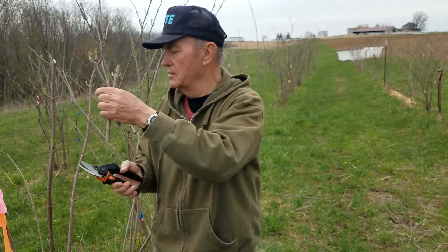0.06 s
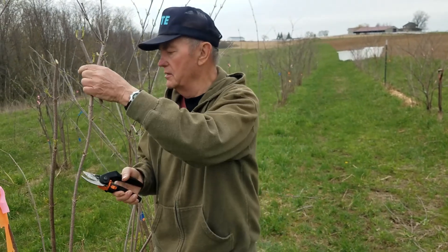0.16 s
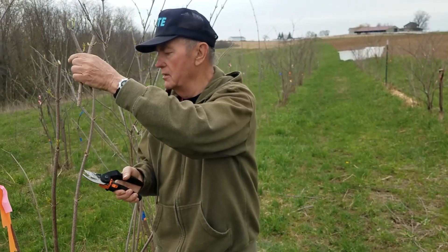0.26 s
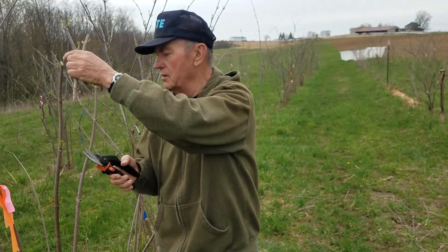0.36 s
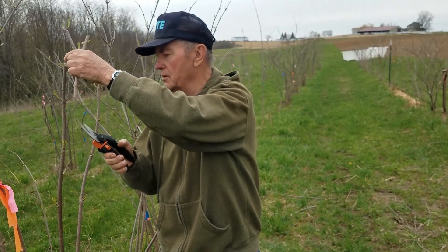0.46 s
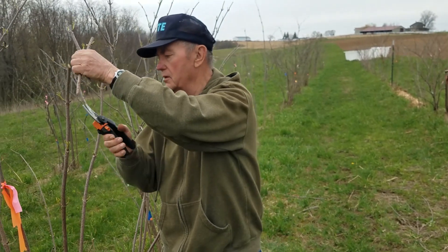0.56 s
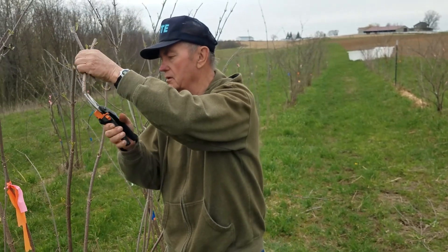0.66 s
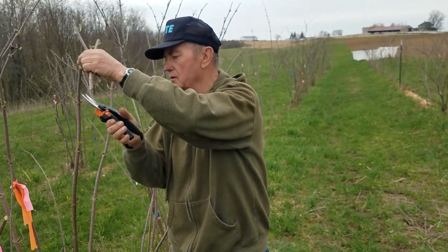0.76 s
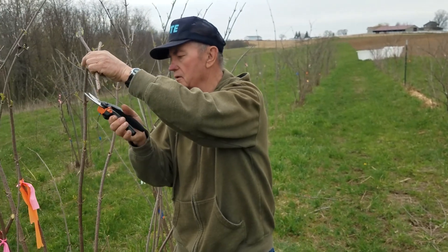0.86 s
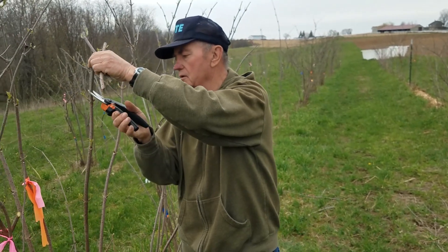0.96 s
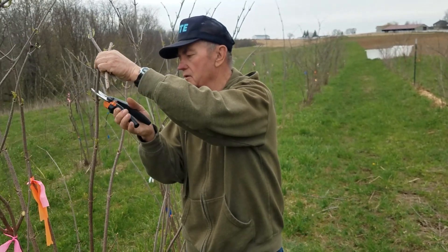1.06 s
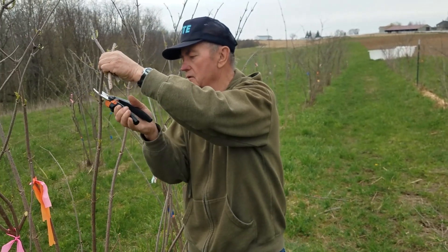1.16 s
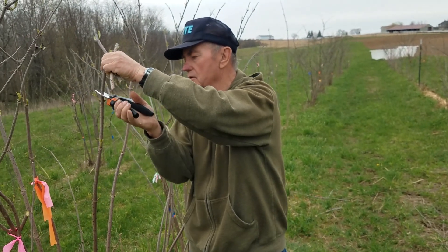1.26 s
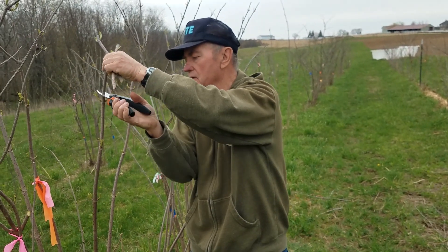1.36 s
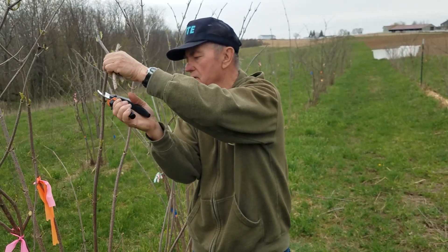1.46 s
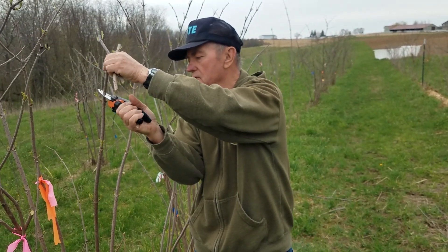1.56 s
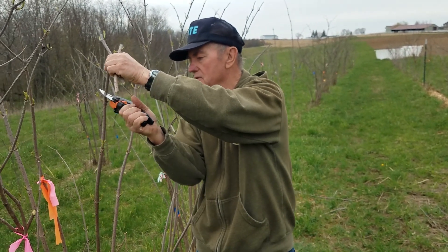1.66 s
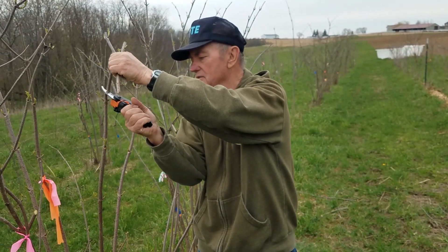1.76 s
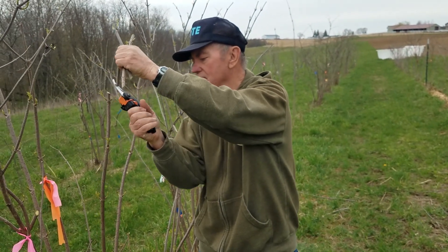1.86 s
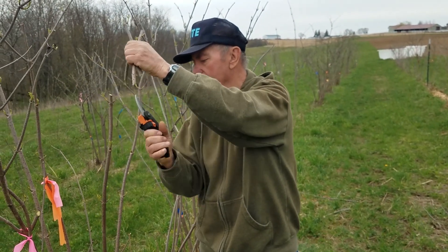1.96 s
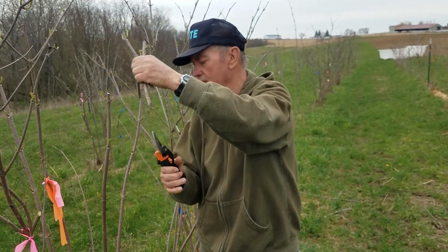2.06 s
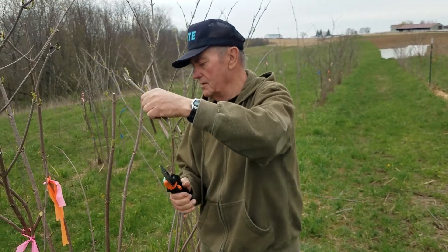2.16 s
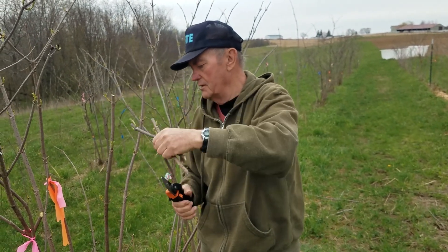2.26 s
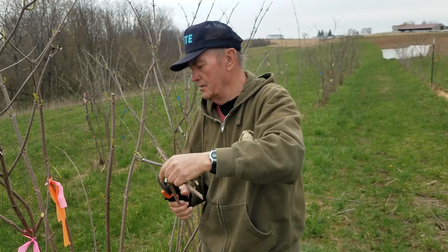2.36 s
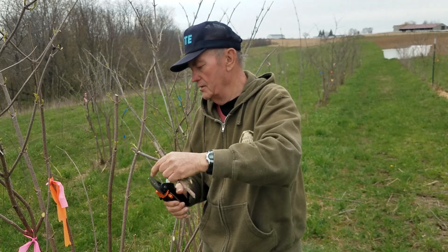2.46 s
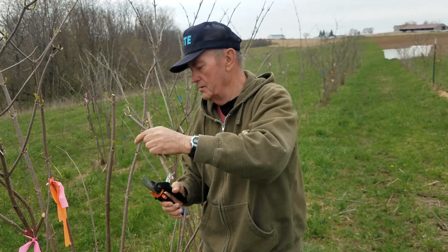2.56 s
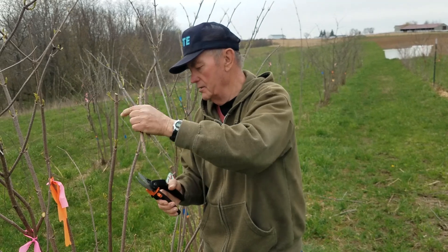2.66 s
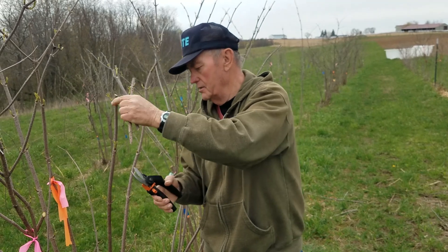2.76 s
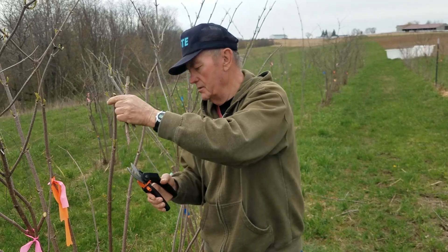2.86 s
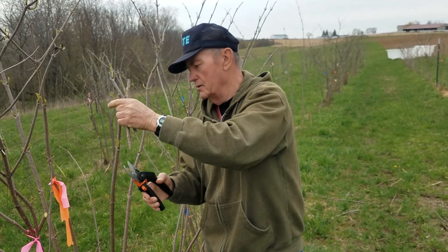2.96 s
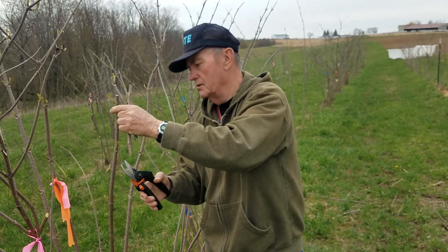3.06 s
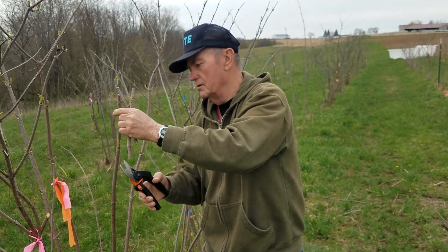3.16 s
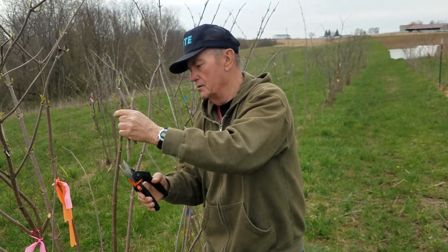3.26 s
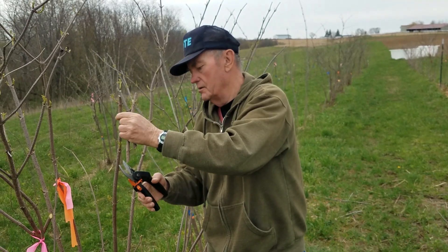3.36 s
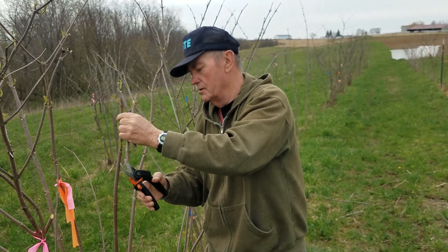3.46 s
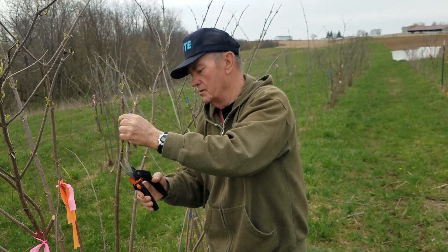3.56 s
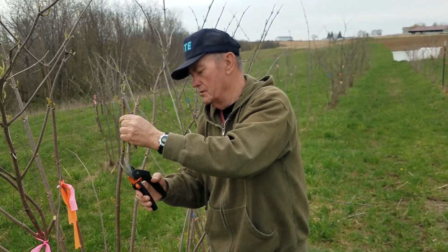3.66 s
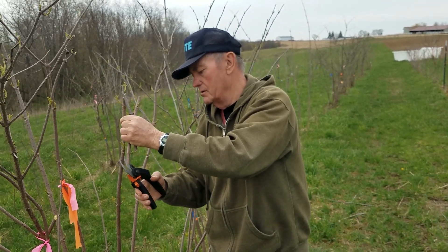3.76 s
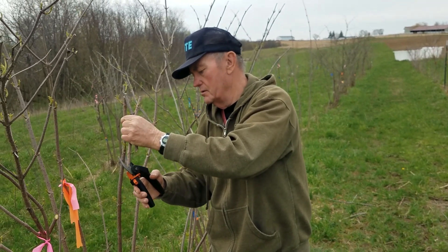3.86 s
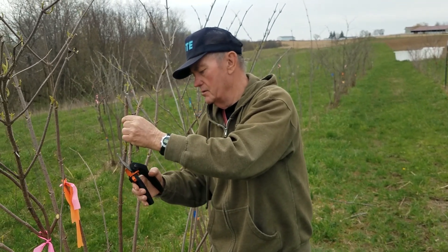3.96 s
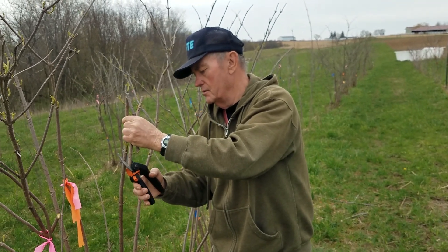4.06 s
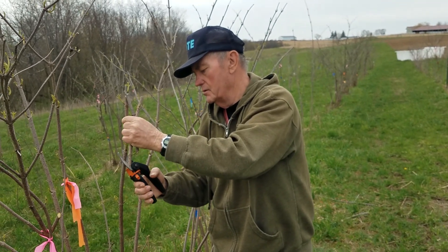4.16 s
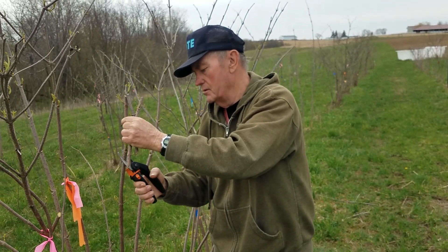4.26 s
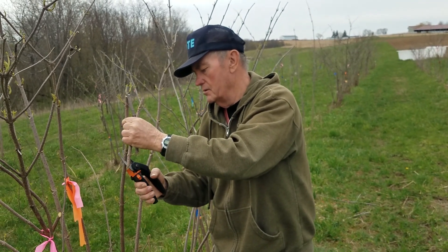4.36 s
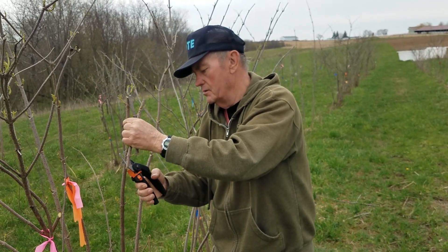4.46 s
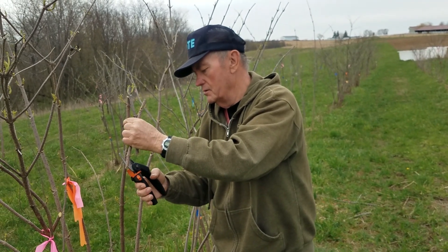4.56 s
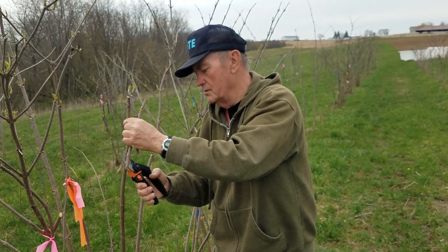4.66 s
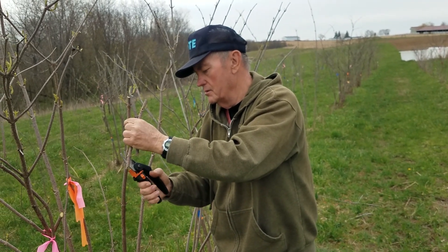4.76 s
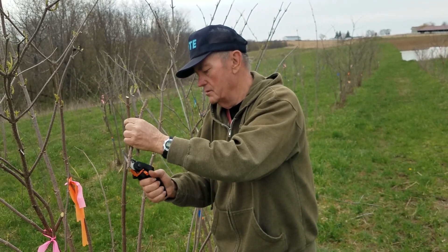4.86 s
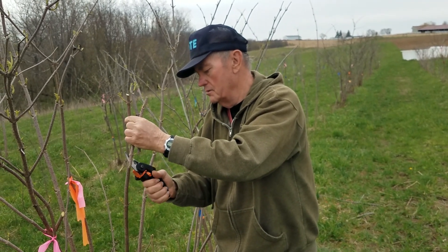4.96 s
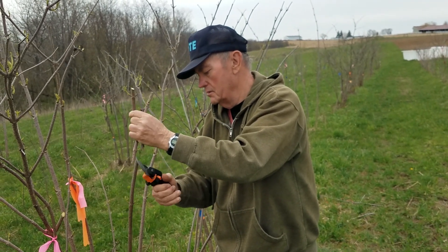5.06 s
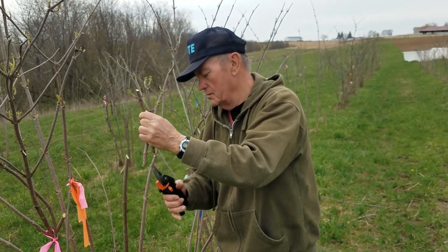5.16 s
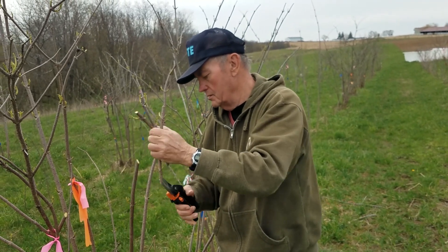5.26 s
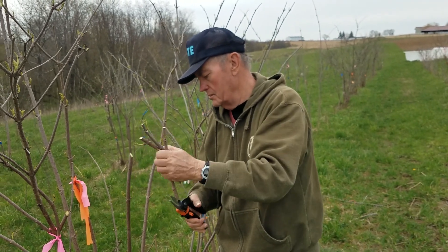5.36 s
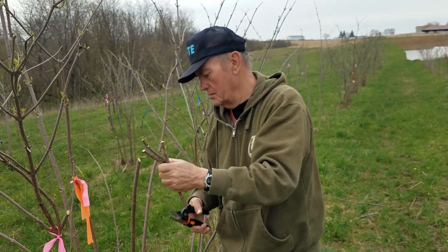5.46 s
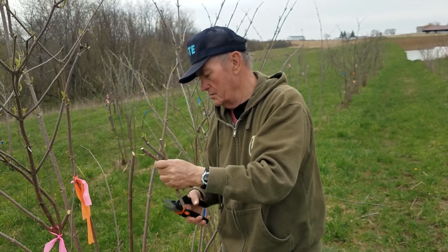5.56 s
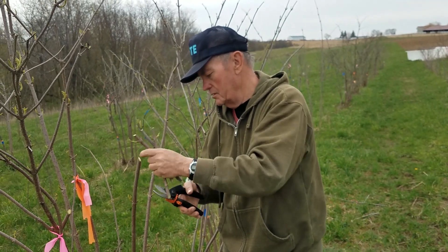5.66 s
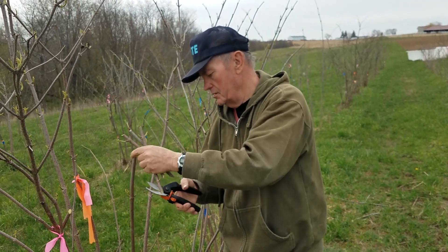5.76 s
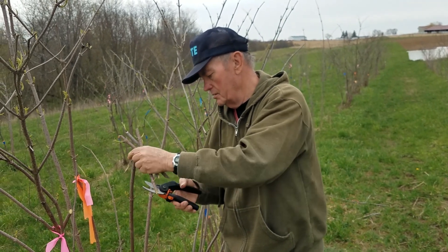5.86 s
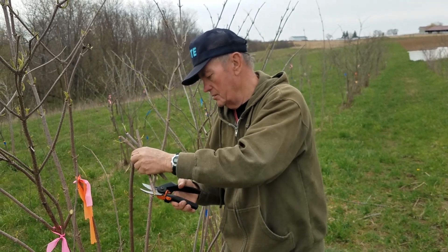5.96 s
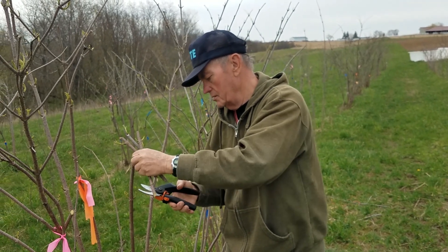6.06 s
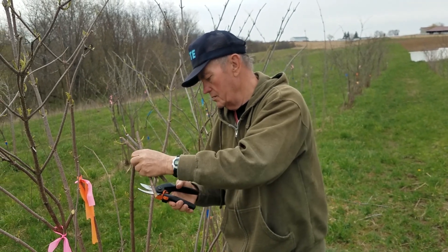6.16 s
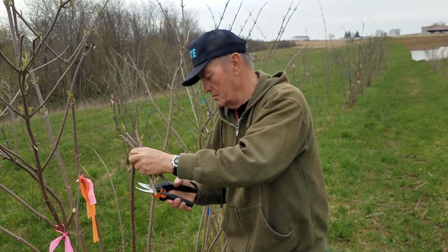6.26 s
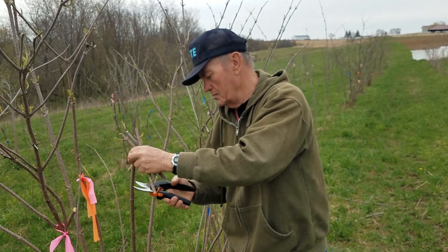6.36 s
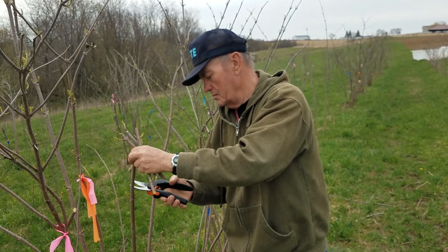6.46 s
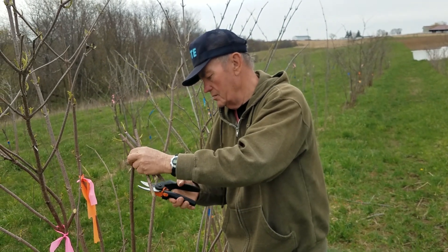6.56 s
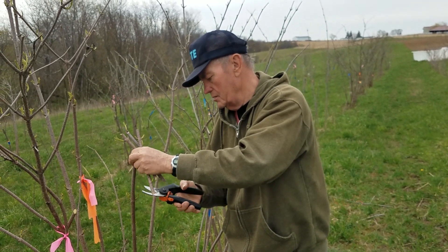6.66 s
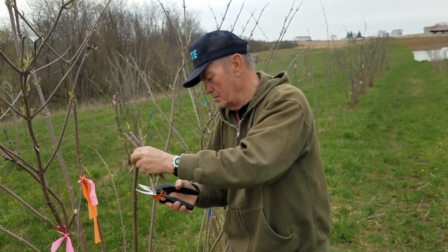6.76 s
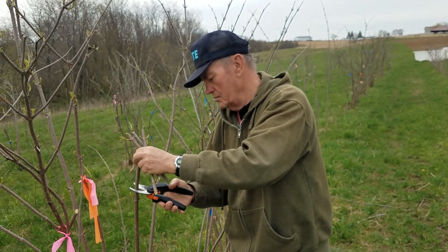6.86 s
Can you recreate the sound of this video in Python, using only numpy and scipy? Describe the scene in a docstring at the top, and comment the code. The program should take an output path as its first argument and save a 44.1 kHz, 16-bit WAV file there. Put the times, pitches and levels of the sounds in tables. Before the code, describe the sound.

In a quiet open field, pruning shears crackle into a stem nearby and snap it off sharply. Small twig clicks, soft bumps and a light rub of clothing follow, then a second crunching cut ends in another snap. Far birds give thin gliding whistles and chirps, with one clearer falling call near the end. A faint breeze, distant traffic and a low engine hum lie underneath.

```python
"""Hand pruners cut two woody stems in an open field. Fibres crack and crunch in runs of tiny clicks
as the blade sinks in; then the stem snaps, and the blow makes the wood knock and the jaws ring.
Sleeves rub with a soft noise, a hand bumps the tool and the bush, and birds whistle gliding tones
from the edge of a wood. A far engine hums under a light breeze and the wash of a distant road."""
import sys
import numpy as np
from scipy import signal
from scipy.fft import rfft, irfft, next_fast_len
from scipy.io import wavfile

SR = 44100
rng = np.random.default_rng(int(sys.argv[2]) if len(sys.argv) > 2 else 0)


def output_pcm(signal):
    """Save a mono or channel-first signal as 16-bit PCM at the path in sys.argv[1].

    Samples are clipped to [-1, 1] before scaling.
    """
    pcm = np.clip(np.atleast_2d(signal).T, -1, 1) * 32767
    wavfile.write(sys.argv[1], SR, np.round(pcm).astype(np.int16))


N = 305678
TIME = np.arange(N) / SR

# cloth rubs as the arms move: (time [s], length [s], rub level [dB], hiss level [dB])
ARM_MOVES = [(0.0, 0.52, -55, -67), (0.388, 0.47, -84, -63), (0.995, 0.15, -61, -59),
             (2.086, 0.21, -61, -62), (2.698, 0.078, -61, -72), (2.907, 0.12, -61, -58.5)]
# how the far engine and the countryside wash rise and fall: (time [s], relative level [dB])
HUM_LEVELS = [(0.0, -57), (0.06, -57.5), (3.49, -64), (3.57, -62), (3.67, -70.5), (4.92, -63),
              (6.89, -56.5), (6.93, -59)]
WASH_LEVELS = [(0.0, -62), (0.39, -65), (2.41, -65), (3.15, -62.5), (3.65, -65), (5.88, -65), (6.2, -63.5),
               (6.93, -65.5)]
# the tone colour of each noise: (frequency [Hz], relative level [dB])
RUB_COLOUR = [(100, -37), (250, 6), (900, 4), (2200, 1), (4000, -10), (9000, -22.5)]
CLOTH_HISS_COLOUR = [(2000, -20), (5000, -3), (7500, 0), (9500, -4), (14000, 6), (17000, 2)]
DRONE_COLOUR = [(100, -15), (170, -7.5), (240, -3), (290, 9), (340, 4), (450, 1.5), (600, -5), (900, -23)]
BREEZE_COLOUR = [(15, -10), (40, -6.5), (60, 2.5), (110, -0.5), (200, -10.5), (400, -32)]
ROAD_COLOUR = [(500, -18), (700, -3), (820, 3), (930, -8.5), (1150, -6.5), (1500, -33.5)]
WASH_COLOUR = [(350, -17), (550, -4), (700, 3.5), (830, 3), (1000, 0.5), (1500, -2.5), (2300, -4),
               (3200, -10), (4500, -21.5), (8000, -66.5)]
AIR_HISS_COLOUR = [(2060, -5.5), (3500, -0.5), (4210, -1), (5220, -3), (5670, -5), (8150, -16), (11800, -6),
                   (14900, 2.5), (16000, -11)]
# how alike a noise is on the left and right: (frequency [Hz], likeness [0 to 1])
EAR_LIKENESS = [(40, 0), (150, 0), (300, 0.58), (700, 0.38), (1500, 0.088), (3000, 0), (6000, 0),
                (14000, 0)]

# the blade grazes the bark: (time [s], level [dB])
BARK_GRAZES = [(1.371, -18.5), (1.407, -19.5), (1.522, -9), (1.663, -18.5), (2.763, -20.5), (4.102, -21.5),
               (4.162, -15.5), (4.744, -20), (4.768, -7), (5.818, -18.5)]
# the blade sinks into a stem, and later the cut end brushes the twigs:
# (time [s], crush level [dB], squeeze level [dB], splinter level [dB], brush time [s])
STEM_CUTS = [(1.547, -10.5, -17.5, -6, 1.776), (4.805, 3.5, -8.5, -13, 4.911)]
# single fibres and twigs crack: (time [s], level [dB], treble tilt [dB per tenfold frequency])
FIBRE_CRACKS = [(1.38, -27, 4), (1.5116, -23, 9), (1.5217, -13, -9), (1.53, 0.5, -14.5), (1.7788, -14, -31),
                (2.2524, -10.5, -21), (3.435, -32.5, 3), (4.147, -24, 2), (4.1677, -16, 8),
                (4.773, 1.5, -7), (4.786, -22, 24), (5.054, -19, -7)]
# the stem gives way:
# (time [s], tear length [s], fibre level [dB], stem level [dB], blade level [dB], stem pitch [factor])
STEM_SNAPS = [(1.7033, 0.00065, 9, 7, 31, 0.74), (1.705, 0.003, 9.5, 16, 27, 1.32),
              (1.7126, 0.0014, 1, 8.5, -11, 1.04), (4.876, 0.0063, 7, 12, 17, 0.88),
              (4.8788, 0.00086, -6, 14, 7, 1.33)]
# the tones at which fibres, stem and blade ring: (frequency [Hz], width [Hz], level [dB])
FIBRE_TONES = [(1820, 500, 2.5), (2496, 730, 5), (4164, 3600, -3), (6470, 1280, 0.5), (7450, 710, 1),
               (14500, 2800, -3.5)]
STEM_TONES = [(193, 52, -9.5), (377, 54, -3), (737, 150, -2.5), (963, 48, 2.5), (1298, 73, 0),
              (1700, 230, 4), (2225, 96, 1), (3090, 1100, -10.5), (4160, 340, -45)]
BLADE_TONES = [(2460, 110, -1), (2900, 90, -36), (4010, 67, -20.5), (5070, 620, -9.5), (5144, 180, -2.5),
               (7440, 210, -19)]

# a bird whistles even glides, often two voices at once:
# (time [s], length [s], start pitch [Hz], end pitch [Hz], level [dB])
BIRD_WHISTLES = [(1.97, 0.16, 2800, 3210, -60), (1.985, .29, 3206, 4050, -58),
                 (3.44, 0.12, 2840, 2855, -63), (3.447, 0.18, 3030, 3120, -72),
                 (3.835, 0.14, 2823, 2845, -61), (3.85, 0.18, 3244, 3040, -71),
                 (4.408, 0.25, 3360, 4000, -69)]
# short rising tweets: (time [s], level [dB])
BIRD_TWEETS = [(4.021, -68), (5.2, -63.5), (5.31, -67.5)]
# a call lingers, drops and settles low: (time [s], length [s], time to half way down [s], level [dB])
BIRD_SLURS = [(5.607, 0.078, .028, -63.5), (5.833, 0.26, 0.042, -47)]
# the hand bumps the tool and the bush: (time [s], pitch [Hz], level [dB])
HAND_BUMPS = [(2.091, 119, 0), (2.725, 257, 1), (2.776, 241, -1)]


def from_db(db):
    """Turn decibels into a gain."""
    return 10 ** (np.asarray(db) / 20)


def unit_energy(x):
    """Scale so that the squares of each channel add up to one."""
    return x / np.sqrt(np.sum(x ** 2, axis=-1, keepdims=True) + 1e-20)


def curve(points, at):
    """Read a two-column table between its rows."""
    return np.interp(at, *np.transpose(points))


def at_hz(points, hz):
    """Read a table by frequency, with octaves evenly spaced."""
    table_hz, values = np.transpose(points)
    return np.interp(np.log(hz + 1), np.log(table_hz), values)


def add(track, s, sound):
    """Mix a sound into a track, starting at s seconds."""
    at = max(0, round(s * SR))
    track[at:at + len(sound)] += sound[:max(0, N - at)]


def noise(colour):
    """Stereo noise of a given colour and an average power of one."""
    size = next_fast_len(N)
    hz = np.fft.rfftfreq(size, 1 / SR)
    shared, opposed = rfft(rng.standard_normal((2, size)))
    alike = at_hz(EAR_LIKENESS, hz)
    pair = np.sqrt(1 + alike) * shared + np.sqrt(1 - alike) * opposed * [[1], [-1]]
    coloured = irfft(pair * from_db(at_hz(colour, hz)), size)[:, :N]
    return np.sqrt(N) * unit_energy(coloured)


def resonate(x, tones, pitch=1):
    """Make an object ring at its own tones; neighbouring tones swing against each other."""
    out = 0
    for k, (hz, width, db) in enumerate(tones):
        decay = np.exp(-np.pi * width / SR)
        turn = 2 * np.pi * hz * pitch / SR
        ring = signal.lfilter([1, 0, -1], [1, -2 * decay * np.cos(turn), decay ** 2], x + 1e-18)
        out = out + (-1) ** k * from_db(db) * (1 - decay ** 2) / 2 * ring
    return out


def swell(length):
    """A quick rise and a slower fall."""
    progress = np.linspace(0, 1, max(8, round(length * SR)))
    return np.sin(np.pi * progress ** 0.53) ** 2


def passing(at_s, width_s):
    """The gain of something that comes near and moves away again."""
    return 1 / np.hypot(1, (TIME - at_s) / width_s)


def scatter(x, fade_s, low_hz, high_hz):
    """Countless weak echoes, different at each ear, that fall by 60 dB in fade_s."""
    tail = rng.standard_normal((2, SR)) * from_db(-60 * TIME[:SR] / fade_s)
    band = signal.butter(1, [low_hz, high_hz], "band", fs=SR, output="sos")
    return signal.fftconvolve(x[None], signal.sosfilt(band, unit_energy(tail)), axes=1)[:, :N]


def sleeves():
    """Each arm movement rubs the cloth: a soft noise with a fine hiss on top."""
    rub, hiss = np.zeros((2, N))
    for s, length, rub_db, hiss_db in ARM_MOVES:
        add(rub, s, from_db(rub_db) * swell(length))
        add(hiss, s, from_db(hiss_db) * swell(length))
    return rub * noise(RUB_COLOUR) + hiss * noise(CLOTH_HISS_COLOUR)


def engine(firing_hz=84.2, waver_hz=0.81, left_db=2, right_db=-2, drone_db=-60, putter=0.21):
    """From far away, only the firing tone and a dull drone that pulses with it are left."""
    waver = np.interp(TIME, np.linspace(0, TIME[-1], 28), rng.standard_normal(28))
    phase = 2 * np.pi * np.cumsum(firing_hz + waver_hz * waver) / SR
    hum_db = curve(HUM_LEVELS, TIME) + [[left_db], [right_db]]
    hum = np.sqrt(2) * from_db(hum_db) * np.sin([phase, phase + np.pi / 3])
    drone = from_db(drone_db) * (1 + putter * np.sin(phase)) * noise(DRONE_COLOUR)
    return hum + drone


def air(breeze_db=-65.5, gust_db=-62.5, road_db=-60.5, wash_boost_db=7, hiss_db=-66):
    """A breeze on the microphone with one gust, far traffic, the countryside wash and a fine hiss."""
    gust = from_db(gust_db) * passing(at_s=1.7, width_s=0.39) ** 2
    breeze = (from_db(breeze_db) + gust) * noise(BREEZE_COLOUR)
    road = from_db(road_db) * passing(at_s=3, width_s=0.69) * noise(ROAD_COLOUR)
    wash = from_db(curve(WASH_LEVELS, TIME) + wash_boost_db) * noise(WASH_COLOUR)
    return breeze + road + wash + from_db(hiss_db) * noise(AIR_HISS_COLOUR)


def tiny_breaks(length, per_s=12000, uneven_db=7.0):
    """Breaking fibres make a run of uneven clicks; silence follows, to leave room for ringing."""
    shape = swell(length)
    dice = np.random.default_rng(rng.integers(2 ** 31))
    size, chance, sign = dice.random((len(shape), 3)).T
    strength = from_db(-uneven_db * np.log(size + 0.011))   # many weak, a few strong
    clicks = (chance < per_s / SR) * np.sign(sign - .5) * strength
    return np.pad(unit_energy(clicks * np.sqrt(shape)), (0, SR // 20))


def strokes(crush_s=0.036, strain_s=0.016, splinter_s=0.038, grip_pitch=1.27, freed_db=12):
    """Grazes and cut stages: (time [s], length [s], level [dB], knock boost [dB], pitch [factor])."""
    rows = [(s, 0.03, db, -4, 1) for s, db in BARK_GRAZES]
    for s, crush_db, squeeze_db, splinter_db, brush_at in STEM_CUTS:
        snap_at = min(snap[0] for snap in STEM_SNAPS if snap[0] > s)
        squeeze_at = s + crush_s / 2
        rows += [
            (s, crush_s, crush_db, 6.5, grip_pitch),   # the bark is crushed
            (squeeze_at, snap_at + splinter_s - squeeze_at, squeeze_db, -3, grip_pitch),   # squeeze
            (snap_at - strain_s / 2, strain_s, splinter_db - 2.5, freed_db, grip_pitch),   # fibres creak
            (snap_at, splinter_s, splinter_db, freed_db, grip_pitch),   # splinters part
            (snap_at + 0.03, 0.077, splinter_db - 11.5, freed_db, 1),   # the cut end is pulled free
            (brush_at, 0.017, splinter_db - 19.5, 24.5, 1)]   # it knocks against its neighbours
    return rows


def crunches(breaks_per_stroke=260):
    """A slow squeeze crackles and a quick crush rasps; the gripped stem rings only at middle tones."""
    out = np.zeros(N)
    grip = signal.butter(2, [650, 1600], "band", fs=SR, output="sos")
    for s, length, db, knock_db, pitch in strokes():
        crackle = tiny_breaks(length, per_s=breaks_per_stroke / length, uneven_db=3.5)
        knock = resonate(tiny_breaks(length), STEM_TONES, pitch)
        add(out, s, from_db(db) * resonate(crackle, FIBRE_TONES))
        add(out, s, from_db(db + knock_db) * signal.sosfilt(grip, knock))
    return out


def cracks(splinter_db=-7, splinter_s=0.0053):
    """One sharp break with a few splinters behind it; thin fibres sound brighter."""
    out = np.zeros(N)
    lowest_hz = FIBRE_TONES[0][0]
    for s, db, tilt_db in FIBRE_CRACKS:
        splinters = from_db(splinter_db) * tiny_breaks(splinter_s)
        crack = signal.unit_impulse(len(splinters)) + splinters
        tones = [(hz, width, level + tilt_db * np.log10(hz / lowest_hz))
                 for hz, width, level in FIBRE_TONES]
        add(out, s, from_db(db) * resonate(crack, tones))
    return out


def snaps(splinter_db=-7):
    """The last fibres tear at once; the freed stem and the closing jaws take one blow."""
    out = np.zeros(N)
    for s, length, fibre_db, stem_db, blade_db, pitch in STEM_SNAPS:
        tear = tiny_breaks(length, per_s=50000)
        blow = signal.unit_impulse(len(tear))
        add(out, s, from_db(fibre_db) * resonate(tear, FIBRE_TONES))
        add(out, s, from_db(stem_db) * resonate(blow + from_db(splinter_db) * tear, STEM_TONES, pitch))
        add(out, s, from_db(blade_db) * resonate(blow, BLADE_TONES))
    return out


def right_side(x, lag_s=0.0001):
    """The right side hears low tones late; high tones are just a quarter cycle out of step."""
    size = next_fast_len(N)
    phase = 2 * np.pi * np.fft.rfftfreq(size, 1 / SR) * lag_s
    return irfft(rfft(x, size) * np.exp(-1j * np.minimum(phase, np.pi / 2)), size)[:N]


def pruners(bounce_s=0.0071, bounce_db=-19, twigs_db=-7, field_db=-29):
    """The cuts come from slightly left, bounce off the ground and scatter from twigs and grass."""
    cut = snaps() + cracks() + crunches()
    bounce = from_db(bounce_db) * np.interp(TIME - bounce_s, TIME, cut, left=0)
    left = cut + bounce
    # thin twigs throw back only the high tones
    treble = signal.sosfilt(signal.butter(2, 4000, "high", fs=SR, output="sos"), cut)
    twigs = from_db(twigs_db) * scatter(treble, fade_s=.022, low_hz=900, high_hz=17000)
    field = from_db(field_db) * scatter(cut, fade_s=0.15, low_hz=147, high_hz=3997)
    return np.array([left, right_side(left)]) + twigs + field


def whistle(hz, waver_hz=28, rise_share=0.31):
    """A slightly unsteady tone that follows a pitch line, swelling quickly and fading slowly."""
    t = TIME[:len(hz)]
    waver = waver_hz * np.interp(t, np.linspace(0, .5, 150), rng.standard_normal(150))
    rise_and_fall = np.interp(t / t[-1], [0, rise_share, 1], [0, 1, 0])
    shape = np.sin(np.pi / 2 * rise_and_fall) ** 1.54
    return np.sqrt(2) * shape * np.sin(2 * np.pi * np.cumsum(hz + waver) / SR)


def glide(length, from_hz, to_hz):
    """A whistle whose pitch moves evenly."""
    return whistle(np.linspace(from_hz, to_hz, round(length * SR)))


def birds(slur_from_hz=3620, slur_to_hz=2340, chips_at_s=4.502, chip_every_s=0.0912, chip_db=-72.5):
    """Far whistles, tweets, falling slurs and chips, smeared by echoes from the trees."""
    whistles, calls = np.zeros((2, N))
    for s, length, from_hz, to_hz, db in BIRD_WHISTLES:
        add(whistles, s, from_db(db) * glide(length, from_hz, to_hz))
    for s, db in BIRD_TWEETS:
        add(whistles, s, from_db(db) * glide(0.096, from_hz=2520, to_hz=2800))
    for s, length, drop_s, db in BIRD_SLURS:
        height = 1 / (1 + (TIME[:round(length * SR)] / drop_s) ** 3.3)
        add(calls, s, from_db(db) * whistle(slur_to_hz + (slur_from_hz - slur_to_hz) * height))
    for k in range(9):   # another bird repeats one falling chip
        chip = from_db(chip_db + rng.normal(0, 2)) * glide(0.034, from_hz=5250, to_hz=4000)
        add(calls, chips_at_s + k * chip_every_s, chip)
    into_wood = from_db(1) * whistles + from_db(-4) * calls
    return whistles + calls + scatter(into_wood, fade_s=.9, low_hz=1000, high_hz=9000)


def bumps(width_hz=35):
    """The hand knocks softly on the tool and the bush; each knock is one low, short tone."""
    out = np.zeros(N)
    for s, hz, db in HAND_BUMPS:
        add(out, s, resonate(signal.unit_impulse(SR // 5), [(hz, width_hz, db)]))
    return out


def scene():
    """Pruning close by, over the far sounds of the field."""
    return pruners() + bumps() + sleeves() + birds() + engine() + air()


def record(dry, cutoff_hz=16000):
    """Clip any peak above full scale, then cut the highest treble."""
    treble_cut = signal.ellip(10, .1, 70, cutoff_hz, fs=SR, output="sos")
    return signal.sosfilt(treble_cut, np.clip(dry, -1, 1))


dry = scene()
out = record(dry)
output_pcm(out)
```